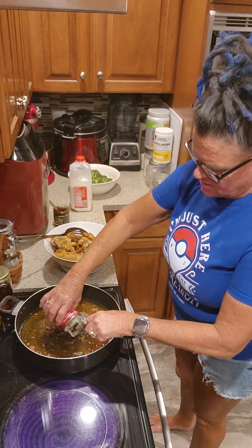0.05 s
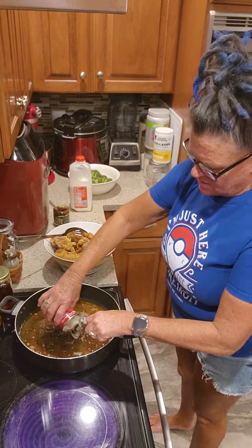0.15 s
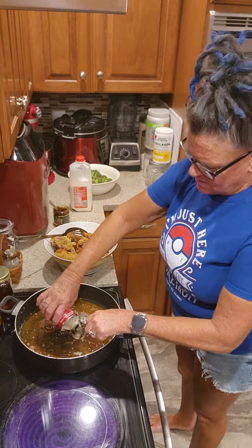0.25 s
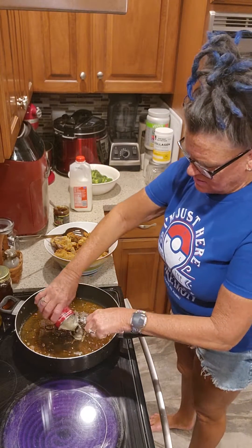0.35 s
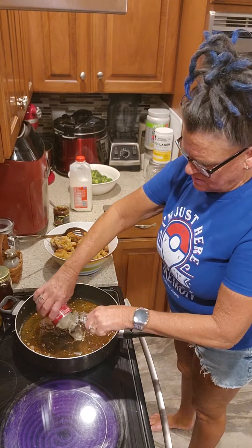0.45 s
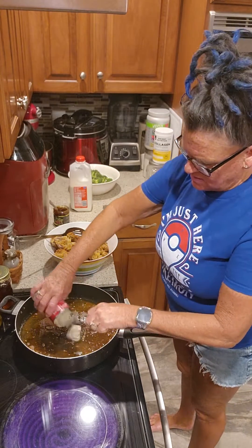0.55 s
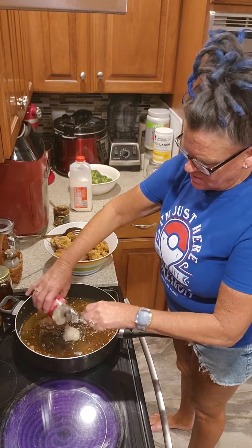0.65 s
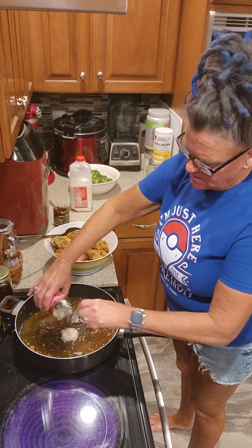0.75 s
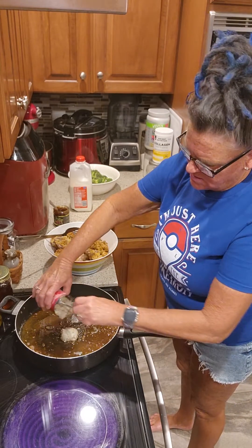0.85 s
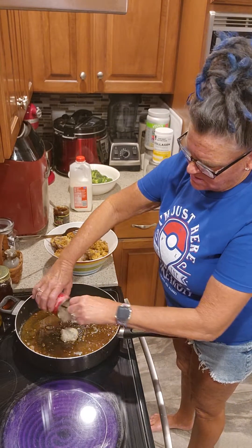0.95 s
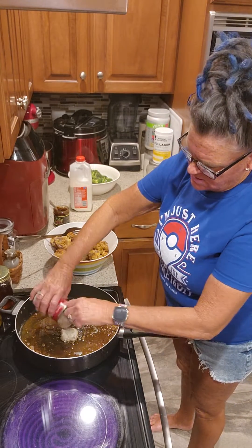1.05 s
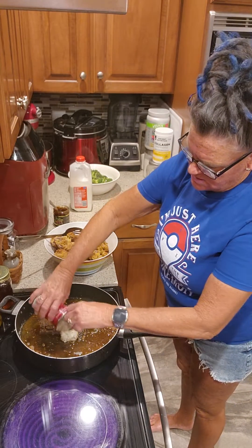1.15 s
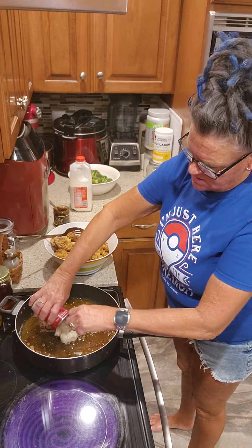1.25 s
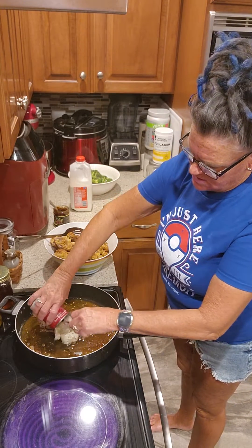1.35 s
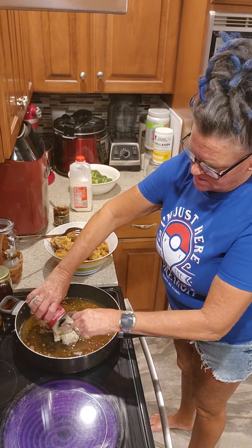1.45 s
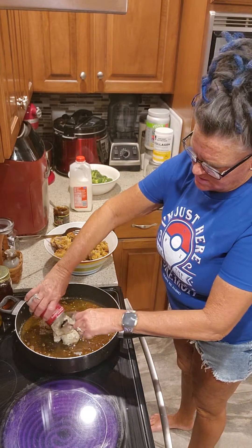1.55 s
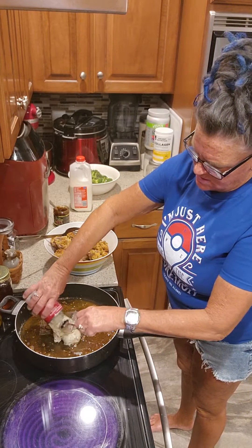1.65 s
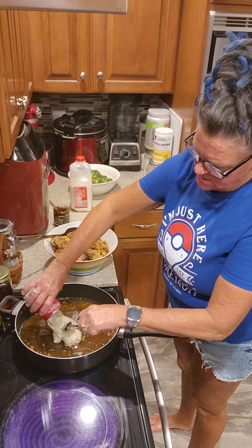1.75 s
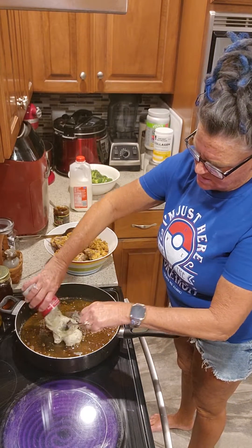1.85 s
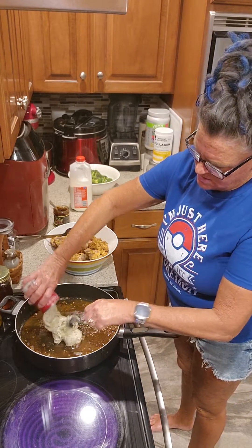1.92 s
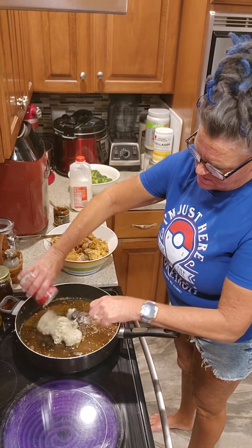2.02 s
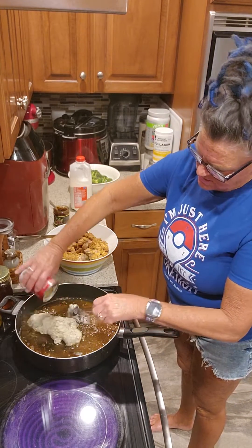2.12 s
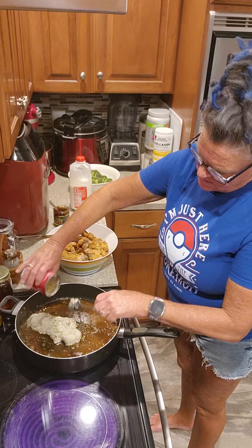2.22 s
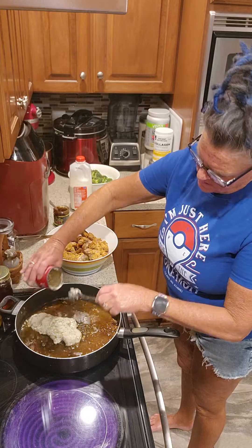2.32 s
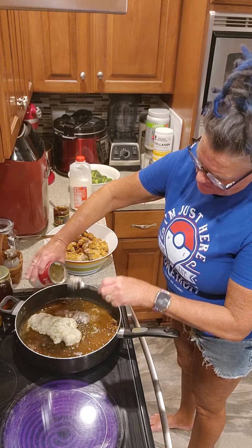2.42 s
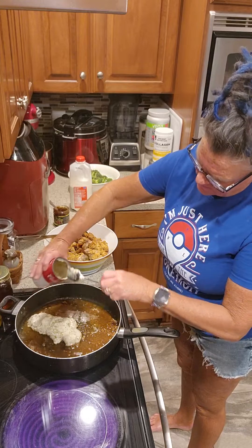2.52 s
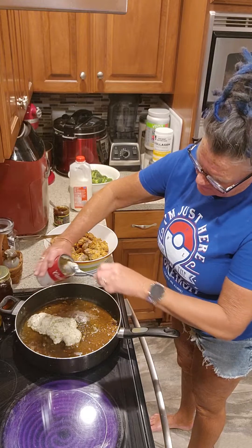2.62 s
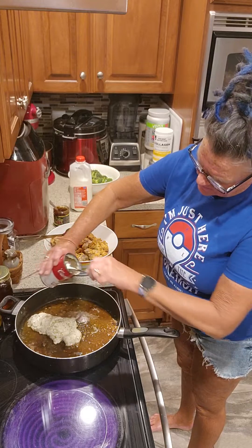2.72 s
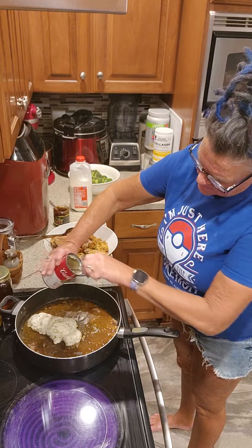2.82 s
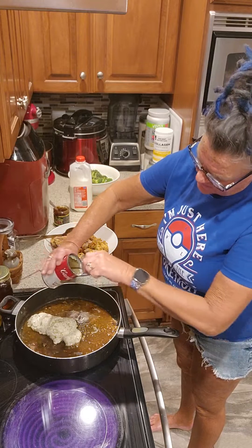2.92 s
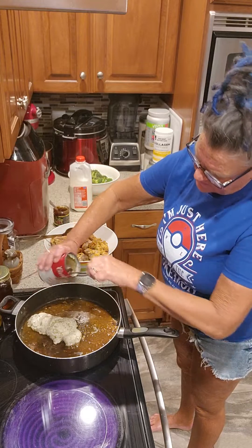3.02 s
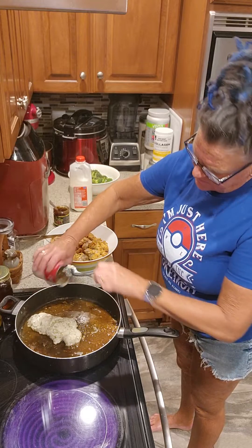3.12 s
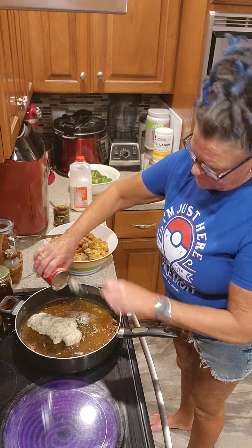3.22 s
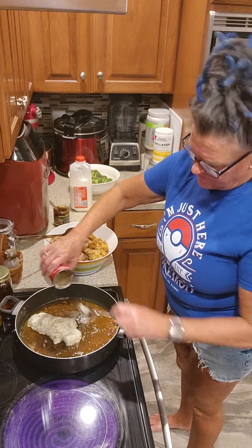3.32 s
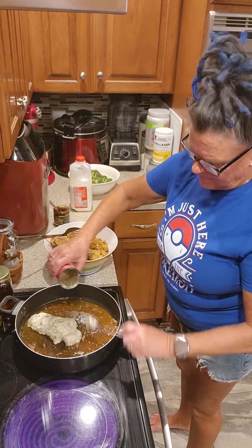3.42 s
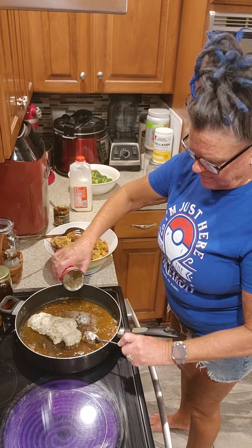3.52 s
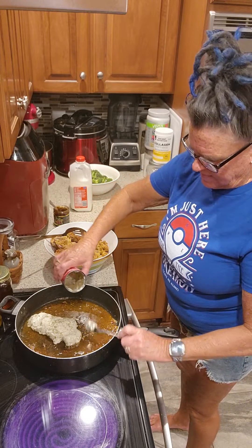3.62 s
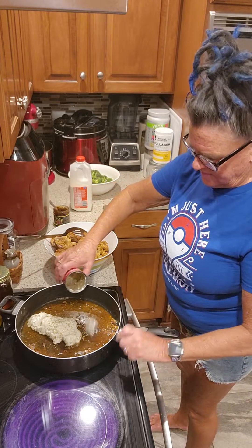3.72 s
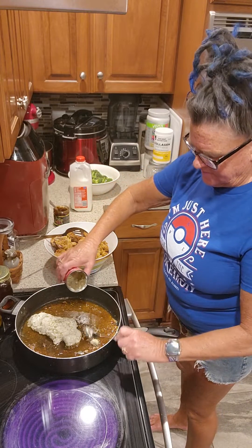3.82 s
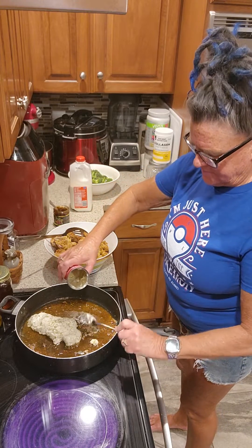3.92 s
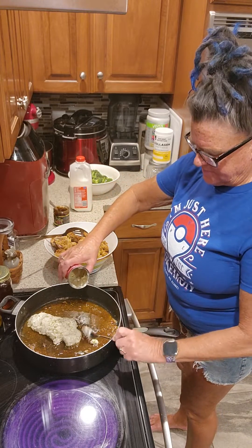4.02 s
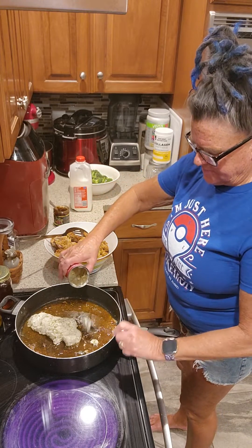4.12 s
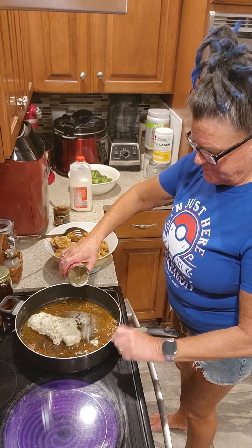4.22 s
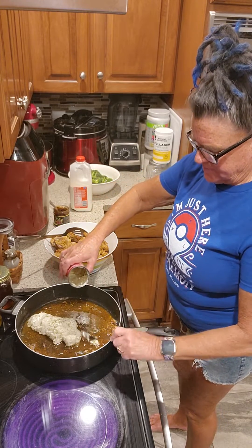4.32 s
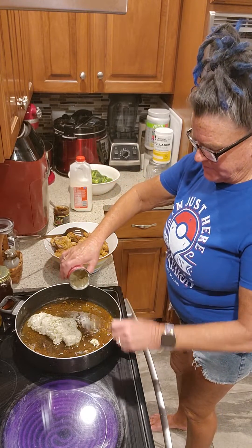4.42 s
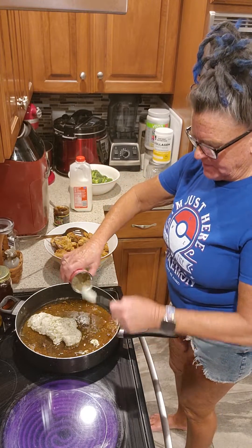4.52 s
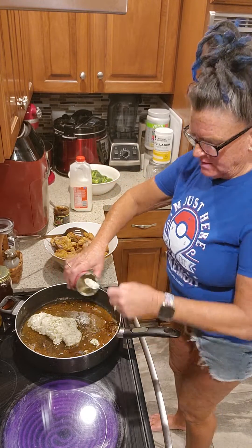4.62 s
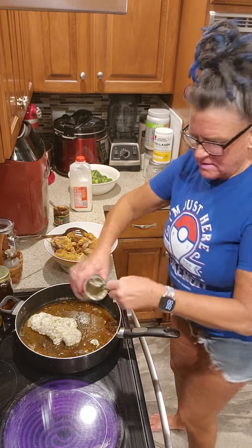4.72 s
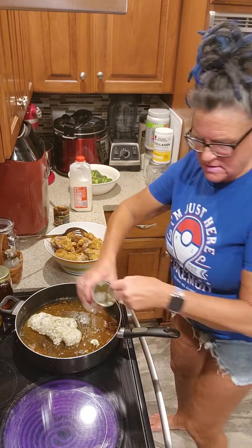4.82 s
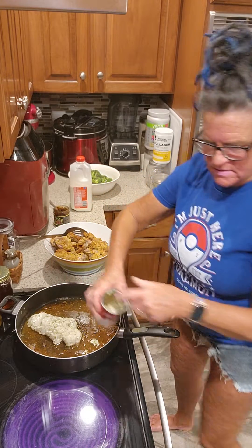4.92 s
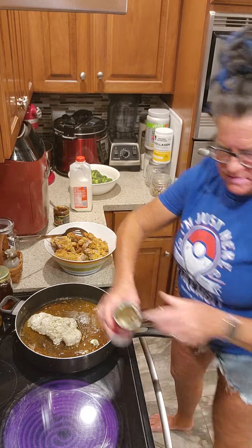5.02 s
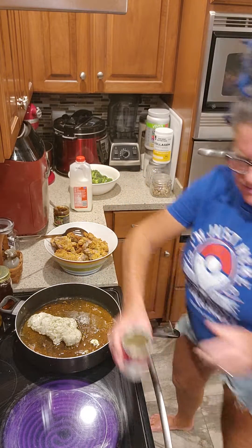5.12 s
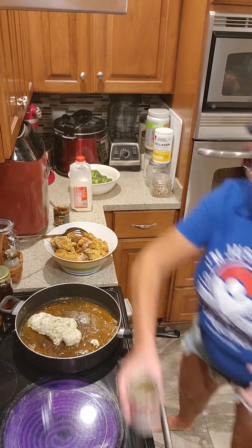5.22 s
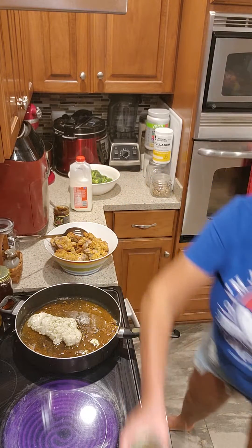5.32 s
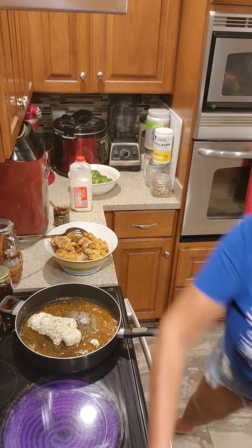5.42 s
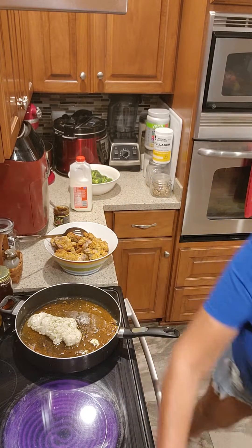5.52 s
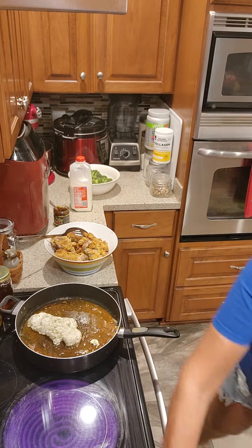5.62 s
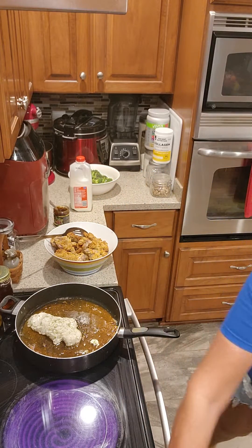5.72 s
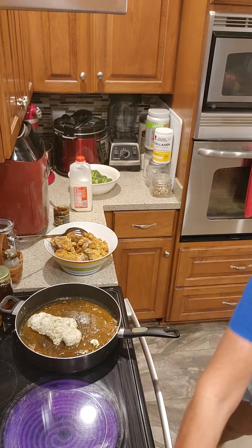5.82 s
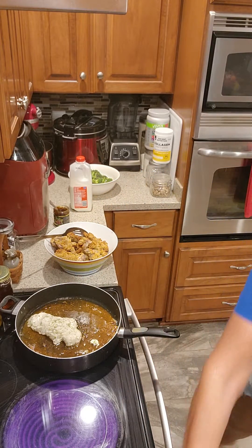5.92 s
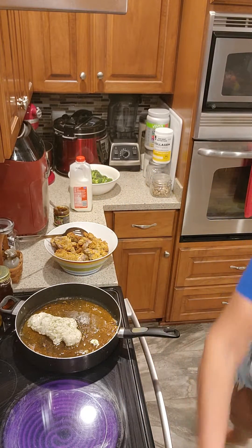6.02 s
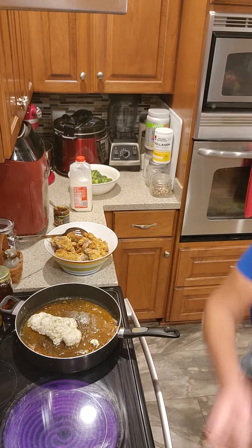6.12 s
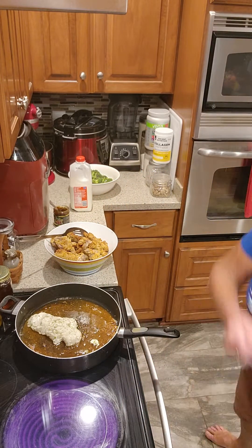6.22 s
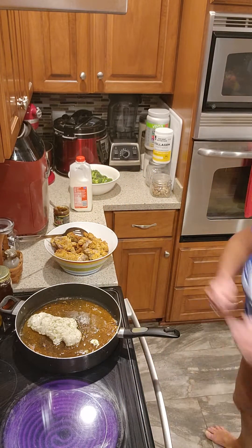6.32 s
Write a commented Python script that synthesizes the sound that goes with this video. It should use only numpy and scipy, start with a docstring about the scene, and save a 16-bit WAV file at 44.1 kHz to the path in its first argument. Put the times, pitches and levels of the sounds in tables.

```python
"""Thick soup is scraped from a tin can into a skillet in a home kitchen. The pan sizzles faintly and flares up
over a motor's hum, moving air and a thin whistle. A spoon ticks and clanks in the can, then knocks four times on
the skillet's rim, which rings and thumps the stove. The spoon drops into the can; a hand slips on the tin; the
can is set down with a soft boom. Metal is decaying sine waves plus short noise; hiss and air are coloured noise."""
import sys
import numpy as np
from scipy import signal
from scipy.fft import rfft, irfft
from scipy.io import wavfile

SR = 44100
rng = np.random.default_rng(int(sys.argv[2]) if len(sys.argv) > 2 else 0)


def file_out(sig):
    """Save sig as 16-bit WAV at sys.argv[1]."""
    # one column per channel
    cols = np.atleast_2d(sig).T
    # limit, then scale
    lim = np.clip(cols, -1, 1)
    pcm = np.round(lim * 32767).astype(np.int16)
    wavfile.write(sys.argv[1], SR, pcm)


N = 280387
TIME = np.arange(N) / SR  # the whole scene [s]
RING = np.arange(int(0.7 * SR)) / SR  # the time of one blow [s]

# spectrum of the can's tinny crack, and of skin rubbing on it: (frequency [Hz], relative level [dB])
TINNY_COLOUR = [(120, -7.5), (450, -6), (750, -6), (1800, -4.5), (2800, -6), (4300, -1), (5200, -5.5),
                (6400, -8.5), (7000, -9.5), (11000, -22), (15500, -16)]


def undb(db):
    """Turn decibels into gain."""
    return 10 ** (np.asarray(db) / 20)


def fade(t60):
    """Exponential decay that loses 60 dB in t60 seconds."""
    return np.exp(-np.log(1000) * RING / t60)


def pan(db):
    """Left and right gains; a positive level difference is louder on the left."""
    return undb(np.array([[db], [-db]]) / 2)


def add(out, s, sound):
    """Mix a stereo sound in at time s."""
    i = int(s * SR)
    out[:, i:i + sound.shape[1]] += sound[:, :N - i]


def noise(colour, size, shade=lambda hz: 0, alike_hz=520):
    """Stereo noise of rms 1 with a (Hz, dB) spectrum; long waves reach both microphones nearly alike."""
    hz = np.maximum(np.fft.rfftfreq(size, 1 / SR), 1)
    points, db = np.transpose(colour)
    level_db = np.interp(np.log(hz), np.log(points), db) + shade(hz)
    mid, side = rfft(rng.standard_normal((2, size)))
    apart = np.clip(hz / alike_hz, 0.22, 1)
    both = (mid + np.array([[1], [-1]]) * apart * side) / np.sqrt(1 + apart ** 2)
    x = irfft(both * undb(level_db), size)
    return x / x.std()


def ring(modes, detune, tilt_db=0, alike_hz=1400):
    """Thin metal rings in many decaying notes (modes), a little different at each blow."""
    out = 0
    for hz, db, t60 in modes:
        pitch = hz * (1 + detune * rng.standard_normal())
        size = undb(db + 0.84 * rng.standard_normal() + tilt_db * np.log2(hz / 2500))
        # short waves reach each microphone in their own phase
        phase = rng.random() + min(hz / alike_hz, 1) * rng.random((2, 1))
        out = out + size * fade(t60) * np.sin(2 * np.pi * (pitch * RING + phase))
    return out * (1 - fade(0.0031))  # soft start


def chatter(grain_s=0.0012, depth_db=4.5):
    """Surfaces make and break contact many times within one blow: a jumpy gain of rms 1."""
    steps = np.arange(0, RING[-1] + grain_s, grain_s)
    gain = undb(depth_db * np.interp(RING, steps, rng.standard_normal(len(steps))))
    return gain / np.sqrt(np.mean(gain ** 2))


def kitchen(early_t60=0.24, late_t60=0.47, treble_t60=0.13, late_db=-5, dull_hz=6500):
    """Room echoes of unit energy: strong early ones off the cupboards, then a tail whose treble dies first."""
    wash = noise([(60, -0.5), (400, -4.5), (900, -2.5), (6000, -4), (15000, 0.0)], len(RING))
    dull = signal.sosfiltfilt(signal.butter(2, dull_hz, fs=SR, output="sos"), wash)
    tail = dull * fade(late_t60) + (wash - dull) * fade(treble_t60)
    response = wash * fade(early_t60) + undb(late_db) * tail
    response = response * np.clip((RING - 0.003) / 0.0098, 0, 1)  # echoes arrive after the direct sound
    return response / np.sqrt(np.sum(response ** 2) / 2)


def in_room(sound, room, db):
    """A sound with its echoes, in stereo; db is the level of the echoes."""
    sound = np.atleast_2d(sound)
    echoes = signal.fftconvolve(sound, room, axes=1)[:, :sound.shape[1]]
    return sound + undb(db) * echoes


def skillet(room, clack_t60=0.076, spoon_db=6, spoon_octaves=0.64, note_db=2, note_t60=0.017,
            note_pan_db=-9, room_db=-5.0):
    """Each knock clacks, rings spoon and pan, and bounces the pan on the hollow stove top."""
    # spoon on the skillet's rim: (time [s], clack level [dB], ring level [dB], stove thump level [dB],
    # the spoon's own note [Hz], left minus right [dB])
    knocks = [(3.5512, -11.5, -21, -17.5, 6210, -2), (3.825, -11.5, -26, -17, 4350, -2),
              (4.0821, -13.5, -20.5, -19, 4750, -2.5), (4.3107, -12.5, -22, -18, 4555, -1.5)]
    # skillet and stove top bouncing together: (frequency [Hz], relative level [dB], t60 [s])
    stove_modes = [(69.8, -3.5, 0.36), (130, -9, 0.25), (172, -2.5, .2), (193, 3, 0.12), (229.6, 0, .16),
                   (260.4, 5, 0.13), (293, -21.5, 1), (354.5, -1, 0.17), (367, -9, 0.12),
                   (423.4, -6.5, 0.14), (449.4, -17, 0.29), (511, -12.5, 0.19), (592, -8.5, 0.1)]
    # the skillet's wall: (frequency [Hz], relative level [dB], t60 [s])
    wall_modes = [(916, -12.5, 0.066), (1056, -17, 0.21), (1472, -12, .14), (1706, -13.5, .12),
                  (2120, -2.5, 0.089), (2180, -7, 0.15), (2200, -13.5, 0.29), (2375, -13, 0.11),
                  (3710, -12.5, 0.12), (3970, -7.5, .1), (4410, -12.5, 0.092), (4530, -5, 0.073),
                  (4740, -7, .08), (5150, -2.5, .11), (5570, -8, 0.22), (5700, -12.5, 0.16),
                  (6340, -13.5, 0.16), (7612, -11.5, 0.084), (8240, -1, .025), (8530, -1.5, 0.059),
                  (8700, -2.5, .02)]
    # the dense, short-lived modes of a knock: (frequency [Hz], relative level [dB])
    clack_colour = [(250, -15), (550, -2.5), (1200, -2.5), (2200, 3.5), (2800, -7.5), (4000, -2),
                    (5300, 1.5), (6900, -6), (9500, -8), (13000, -13), (15500, -13.5)]
    # close modes of pan and spoon that bunch together and colour the clack:
    # (frequency [Hz], width [Hz], boost [dB])
    clusters = [(940, 130, 6), (2154, 180, 6), (3930, 130, 4), (8450, 130, 14), (11400, 390, 6.5),
                (14000, 400, 6)]
    shudder_colour = [(30, -21.5), (70, 9.0), (300, 4.5), (600, -13.5), (2000, -53.5)]  # (Hz, dB)

    out = np.zeros((2, N))
    thump = sum(undb(db) * fade(t60) * np.sin(2 * np.pi * hz * RING) for hz, db, t60 in stove_modes)
    thump = thump * (1 - fade(0.014))  # the heavy pan takes a moment to move
    for s, clack_db, ring_db, thump_db, spoon_hz, pan_db in knocks:
        def shade(hz):
            """Extra level around the spoon's note and the clusters."""
            spoon = spoon_db * np.exp(-(np.log2(hz / spoon_hz) / spoon_octaves) ** 2)
            return spoon + sum(db * np.exp(-((hz - centre) / width) ** 2) for centre, width, db in clusters)

        clack = noise(clack_colour, len(RING), shade) * fade(clack_t60) * (1 - fade(0.0073)) * chatter()
        # the hand damps the spoon's note at once; it beams to the right
        note = ring([(spoon_hz, note_db, note_t60)], detune=0.0043) * pan(note_pan_db)
        # the pan is not quite round, so each of its modes is a beating pair
        pair = (ring(wall_modes, detune=0.006) + ring(wall_modes, detune=0.006)) / np.sqrt(2)
        metal = undb(clack_db) * (clack + note) + undb(ring_db) * pair
        # the stove's loose panels go on shuddering
        shudder = noise(shudder_colour, len(RING)) * fade(0.82) * (1 - fade(0.06))
        stove = in_room(thump, room, -12.5) + undb(-16) * shudder
        add(out, s, in_room(metal * pan(pan_db), room, room_db) + undb(thump_db) * stove)
    return out


def clink(crack_db, ring_db, tilt_db=0, crack_t60=0.066):
    """One contact with the can: a tinny crack and the ring of its wall; tilt_db (per octave) brightens both."""
    # the can's wall: (frequency [Hz], relative level [dB], t60 [s])
    can_modes = [(704, -8.5, 0.057), (752.6, -1.5, 0.078), (996, -9, 0.085), (1151, -7, 0.096),
                 (1209, -3.5, 0.14), (1422, -16, 0.14), (1794, -18.5, 0.14), (2210, -11.5, .11),
                 (2746, -7, 0.059), (2990, -10.5, 0.2), (3255, -6, 0.067), (3780, -12, 0.077),
                 (3830, -6, 0.059), (4250, -10, .11), (4500, -19, 0.13), (6500, -14.5, .13)]

    def hardness(hz):
        """A harder contact is brighter."""
        return tilt_db * np.log2(np.clip(hz, 1000, 7000) / 2500)

    crack = noise(TINNY_COLOUR, len(RING), hardness) * fade(crack_t60) * (1 - fade(0.0051)) * chatter()
    return undb(crack_db) * crack + undb(ring_db) * ring(can_modes, detune=0.005, tilt_db=tilt_db)


def scraping(room, spot_t60=0.041, ring_db=-22, pan_db=-3, room_db=-3.5):
    """The spoon ticks dully on the can, damped by soup and hand, which hardly rings except where struck."""
    # (time [s], level [dB], treble tilt [dB per octave], note of the struck spot [Hz], its level [dB])
    ticks = [(0.8187, -46, -9, 2060, -45.5), (.838, -52, -10, 1650, -54), (.918, -55.5, -7.5, 890, -60),
             (1.196, -43, .5, 623, -47.5), (1.415, -56.5, 11, 6520, -56), (2.09, -48.5, 2.5, 2135, -51.5),
             (2.171, -46, -0.5, 1110, -53), (2.802, -40, 5.5, 618, -42), (3.403, -62.5, 8.5, 7170, -60.5),
             (4.8089, -38.5, 3, 5900, -41)]
    out = np.zeros((2, N))
    for s, db, tilt_db, spot_hz, spot_db in ticks:
        spot = ring([(spot_hz, spot_db, spot_t60)], detune=0.002)
        add(out, s, clink(db, db + ring_db, tilt_db) + spot)  # ring_db is relative to the tick
    return in_room(out * pan(pan_db), room, room_db)


def empty_can(room, spot_t60=0.048, uneven=0.08, swing_db=3, room_db=-4):
    """A blow rings wall, rim and struck spot; loose metal may then rattle from side to side, ever weaker."""
    # free blows on the emptied can: (time [s], crack level [dB], wall ring level [dB], rim ring level [dB],
    # note of the struck spot [Hz], its level [dB], rebounds [count], left minus right [dB])
    clanks = [(2.739, -36, -35, -58, 3300, -34, 0, -2), (3.0938, -29, -45.5, -37, 2944, -30, 0, -2),
              (4.9382, -20.5, -28, -45, 2340, -18, 5, -1), (5.013, -29, -33.5, -46, 4530, -29, 3, -4.5),
              (5.0864, -29, -36.5, -34, 701, -26, 0, -0.5), (5.6313, -21.5, -26, -29.5, 2776, -18, 3, -2.5),
              (5.709, -29.5, -42, -44, 2850, -40, 0, -3)]
    # the can's stiff rim, which rings longest: (frequency [Hz], relative level [dB], t60 [s])
    rim_modes = [(2163, -8, .24), (2864, -2.5, 0.2), (2935, -3.5, 0.13)]
    first_s, spread = 0.005, 1.55  # the n-th rebound comes about first_s * n ** spread after the blow
    crack_drop_db, ring_drop_db = -7, -3.5  # first rebound relative to its blow
    loss_db = 2  # what each further rebound loses
    softness_db = -1.5  # treble tilt per octave: rebounds are softer contacts

    out = np.zeros((2, N))
    for s, crack_db, wall_db, rim_db, spot_hz, spot_db, count, pan_db in clanks:
        rim = undb(rim_db) * ring(rim_modes, detune=0.003)
        spot = ring([(spot_hz, spot_db, spot_t60)], detune=0.0025)
        add(out, s, (clink(crack_db, wall_db) + rim + spot) * pan(pan_db))
        for k in range(round(count)):
            late = first_s * (k + 1) ** spread * (1 + uneven * rng.standard_normal())
            rebound = clink(crack_db + crack_drop_db, wall_db + ring_drop_db, softness_db, crack_t60=0.082)
            side_db = pan_db + swing_db * (-1) ** k
            add(out, s + late, rebound * undb(-loss_db * k) * pan(side_db))
    return in_room(out, room, room_db)


def scuff(room, start_s=5.454, level_db=-57, rub_t60=1.0, room_db=-2):
    """The hand slips on the can while carrying it: skin rubs over the tin in a soft, grainy rustle."""
    out = np.zeros((2, N))
    grains = noise(TINNY_COLOUR, len(RING)) * chatter(grain_s=0.004, depth_db=4)
    add(out, start_s, undb(level_db) * grains * fade(rub_t60) * (1 - fade(0.02)))
    return in_room(out, room, room_db)


def counter(thud_t60=0.56):
    """The cupboard under the counter answers the can's weight with a soft boom."""
    # the can's weight on the counter: (time [s], level [dB])
    thuds = [(5.631, -40), (5.708, -41)]
    boom_colour = [(50, -28.0), (110, -17), (190, -3.5), (330, -20), (600, -16), (1500, -35)]  # (Hz, dB)
    out = np.zeros((2, N))
    for s, db in thuds:
        boom = noise(boom_colour, len(RING)) * fade(thud_t60) * (1 - fade(0.017))
        add(out, s, undb(db) * boom)
    return out


def frying_strength(simmer_db=-75.5, attack_s=0.056, cool_s=0.16):
    """A steady simmer, plus flares that rise, hold and die down as the metal cools."""
    # soup is pushed onto hot metal: (time [s], level [dB], hold [s])
    flares = [(0.567, -66.5, .06), (0.887, -71.5, 0.031), (1.276, -70, 0.031), (2.132, -58, .25)]
    power = undb(simmer_db) ** 2
    for s, db, hold_s in flares:
        rise = np.clip((TIME - s) / attack_s, 0, 1)
        cooling = np.exp(-np.maximum(TIME - s - attack_s - hold_s, 0) / cool_s)
        power = power + (undb(db) * rise * cooling) ** 2
    return np.sqrt(power)


def sizzle(room, pops_per_s=55, spread_db=4.5, pop_db=-7):
    """Fine hiss of frying, with tiny bubbles that burst one by one as short, high, decaying notes."""
    # spectrum of the hiss: (frequency [Hz], relative level [dB])
    hiss_colour = [(2500, -28.5), (4000, -7.5), (5500, -2), (7500, -1.5), (9500, -4.5), (11000, -17),
                   (15500, -7.5)]
    pops = np.zeros((2, N))
    t = RING[:256]
    for when, pitch, size, side in rng.random((int(pops_per_s * N / SR), 4)):
        hz = 4500 * 2 ** pitch  # anywhere within one octave
        pop = np.sin(2 * np.pi * hz * t) * np.exp(-hz * t / 4)
        loudness = undb(-spread_db * np.log(max(size, 0.02)))  # few are loud
        add(pops, when * (N - 1) / SR, pop * pan(6 * (side - 0.5)) * loudness)
    pops = in_room(pops, room, -4.5)
    return frying_strength() * (noise(hiss_colour, N) + undb(pop_db) * pops / pops.std())


def background(air_db=-53):
    """An appliance motor hums in steady sine waves over the low rush of moving air."""
    # the motor: (frequency [Hz], rms level [dB])
    hum_notes = [(59.6, -54.5), (118.8, -62.5), (209.9, -73), (242.2, -72.5), (290.7, -70.5)]
    # spectrum of the air: (frequency [Hz], relative level [dB per Hz])
    air_colour = [(15, -49), (25, -18.5), (43, -9), (64, 4), (92, -15.5), (123, -10), (180, -19),
                  (293, -18), (326, -27.5), (363, -22), (560, -33), (1940, -48.5), (2760, -48.5),
                  (6740, -44), (16000, -69)]
    hum = 0
    for hz, db in hum_notes:
        hum = hum + np.sqrt(2) * undb(db) * np.sin(2 * np.pi * (hz * TIME + rng.random()))
    return hum + undb(air_db) * noise(air_colour, N)


def whistle(level_db=-84, waver_s=0.14, waver_db=3):
    """A faint, thin whistle of narrow noise whose level wavers at random."""
    # spectrum of the whistle: (frequency [Hz], relative level [dB])
    whistle_colour = [(1500, -31), (2000, 0), (2600, -26), (3400, -21), (3700, -2.5), (4100, -28)]
    steps = np.arange(0, TIME[-1] + waver_s, waver_s)
    waver = np.interp(TIME, steps, rng.standard_normal(len(steps)))
    return undb(level_db + waver_db * waver) * noise(whistle_colour, N)


def scene():
    """Skillet, can and frying share one kitchen."""
    room = kitchen()
    can = scraping(room) + empty_can(room) + scuff(room) + counter()
    return skillet(room) + can + sizzle(room) + background() + whistle()


def record(dry, low_cut_hz=38, top_hz=15900):
    """The phone thins the deepest bass, rounds off the highest peaks and cuts the top."""
    heard = signal.sosfilt(signal.butter(2, low_cut_hz, "high", fs=SR, output="sos"), dry)
    heard = heard / (1 + (heard / 0.9) ** 4) ** (1 / 4)
    return signal.sosfilt(signal.ellip(8, 0.2, 80, top_hz, fs=SR, output="sos"), heard)


dry = scene()
out = record(dry)
file_out(out)
```